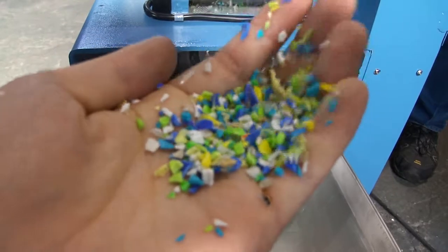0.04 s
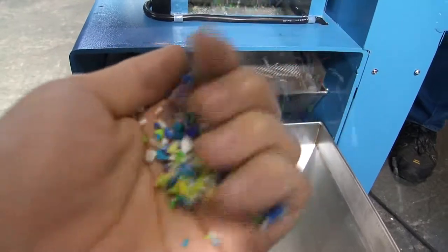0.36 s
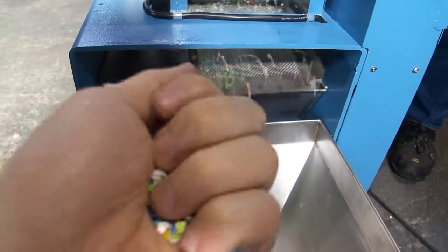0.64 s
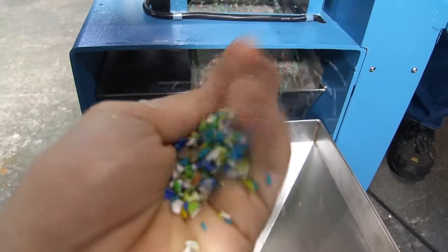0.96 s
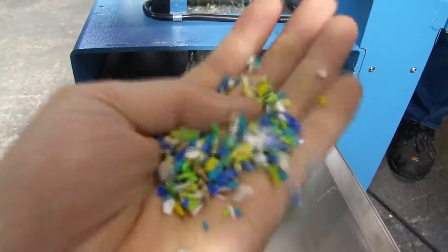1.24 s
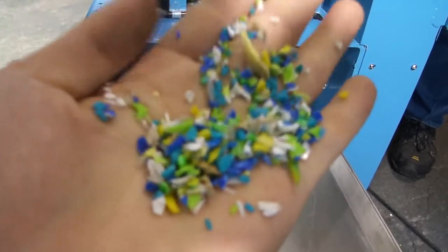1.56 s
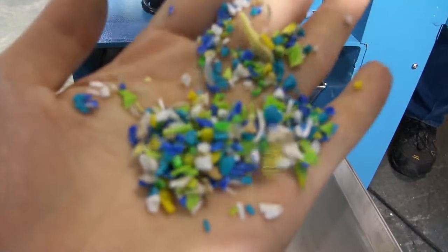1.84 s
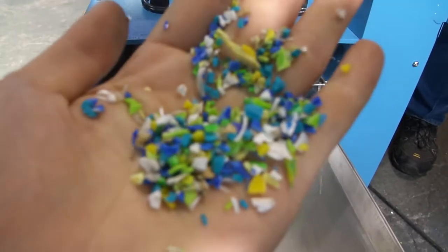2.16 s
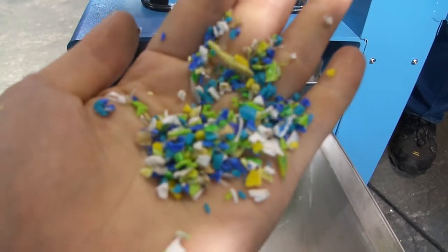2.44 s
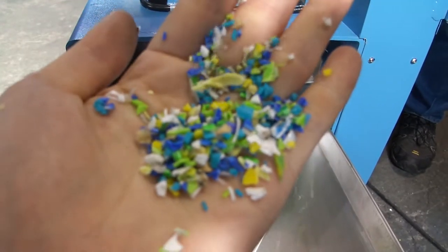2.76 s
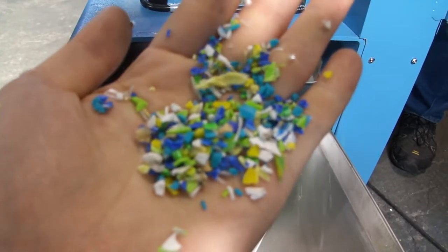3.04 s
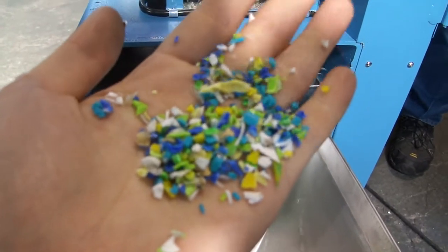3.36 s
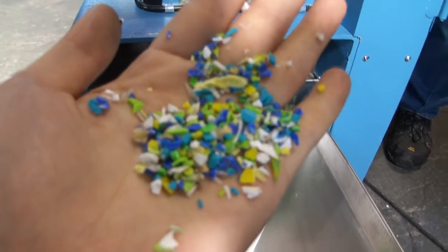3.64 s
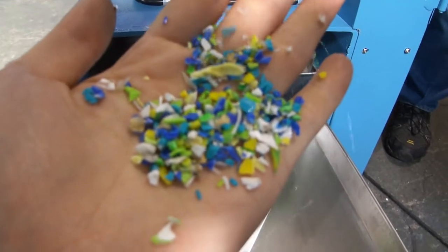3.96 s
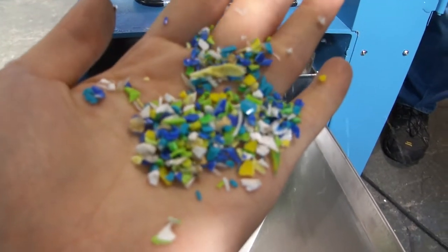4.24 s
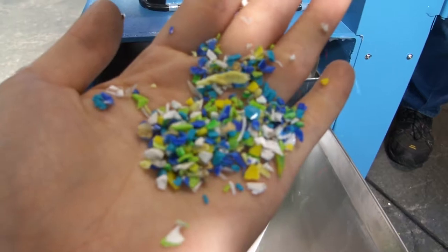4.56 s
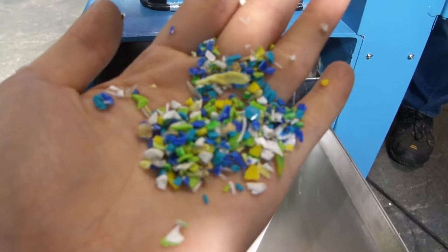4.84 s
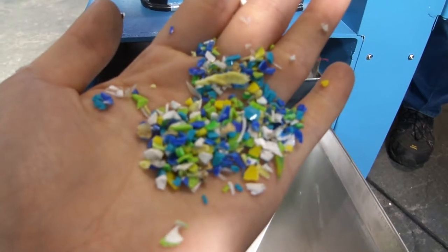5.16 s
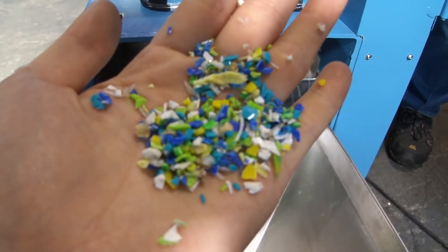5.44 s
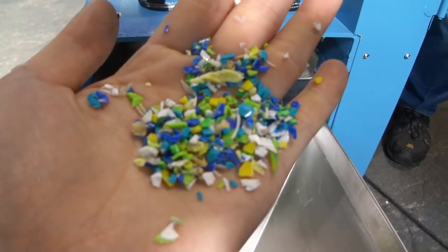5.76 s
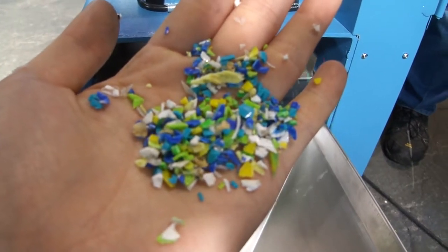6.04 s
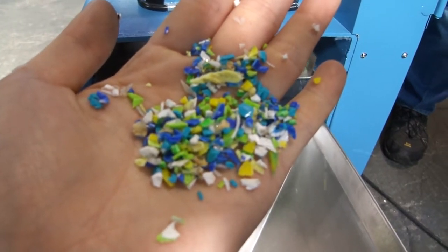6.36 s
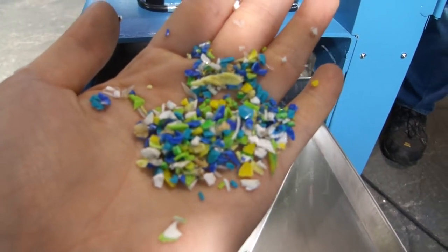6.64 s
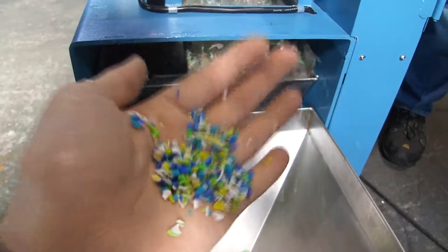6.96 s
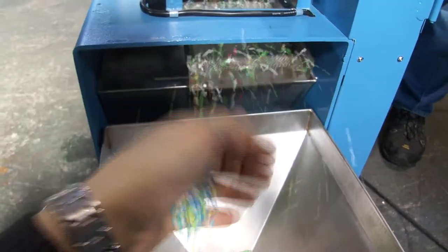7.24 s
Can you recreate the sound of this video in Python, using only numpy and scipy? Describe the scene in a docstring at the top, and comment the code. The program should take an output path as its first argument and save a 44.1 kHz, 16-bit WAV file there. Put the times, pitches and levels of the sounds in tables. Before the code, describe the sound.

A plastic granulator roars and hums as it crunches bottle caps, with flakes clattering steadily onto a sieve and metal tray.

```python
"""A plastic granulator chews bottle caps, heard from just in front of its outlet.
Flakes clatter on the sieve and tray; caps crunch in the knives and clang on the steel chamber.
The rotor's knife snips once a turn, squeaking in spells and throwing chips.
The housing roars and hums with the rotor; a slower shaft drones as it stirs the load.
Underneath lies a faint low rumble with a few swells."""
import sys
import numpy as np
from scipy import signal
from scipy.fft import rfft, irfft, next_fast_len
from scipy.io import wavfile
from scipy.ndimage import uniform_filter1d, minimum_filter1d, map_coordinates

SR = 44100
rng = np.random.default_rng(int(sys.argv[2]) if len(sys.argv) > 2 else 0)


def master(y):
    """Save y as 16-bit WAV."""
    cut = np.clip(np.atleast_2d(y).T, -1, 1)
    pcm = np.round(cut * 32767)  # scale
    wavfile.write(sys.argv[1], SR, pcm.astype(np.int16))


N = 325899
TIME = np.arange(N) / SR
STIR_HZ = 19.1  # speed of the slower shaft

# slow rise and fall of the hum and roar: t/s, level/dB
HUM_LEVEL = [(0.0, -29), (0.33, -25), (0.55, -28), (0.78, -25.5), (1.0, -28), (1.65, -25.5), (2.75, -24.5),
             (3.35, -27), (4.2, -23), (5.3, -25.5), (6.15, -25), (7.39, -28)]
# drumming of the load on the housing: t/s, level/dB
DRUMMING = [(0.0, -31), (0.25, -23.5), (0.54, -39), (0.86, -29), (1.45, -28), (1.75, -25), (2.02, -22.5),
            (2.16, -37), (2.32, -28), (2.47, -21), (2.8, -23), (3.0, -25.5), (3.08, -34), (3.8, -27.5),
            (4.95, -28.5), (5.22, -24), (5.75, -29), (7.05, -26.5), (7.39, -30)]
# spectrum of cracking plastic: f/Hz, level/dB
CRACK_SPECTRUM = [(200, -49), (1100, 10), (1800, 5.5), (2600, 6.5), (5500, 5.5), (8000, 4.5), (10500, 4),
                  (12000, 1.5), (13200, -13)]


def flakes(level_db=-1.5, clump_db=2.0, snap_db=-13):
    """Flakes flung by the slower shaft pelt sieve and tray in clumps; a few near ones snap dryly."""
    # flow of flakes: t/s, level/dB
    flow = [(0.0, -28.5), (0.14, -20.5), (0.27, -23.5), (0.68, -22), (1.67, -25), (2.39, -22),
            (3.33, -25.5), (3.68, -21.5), (4.25, -24), (4.77, -24), (6.34, -24.5), (6.96, -23), (7.39, -23)]
    # flake impact spectrum: f/Hz, level/dB
    spectrum = [(80, -42), (300, -25), (900, -12.5), (1900, -0.5), (2500, 4), (3400, 3), (4300, 1.5),
                (5500, 1), (7000, -0.5), (9000, -3.5), (10300, -1.5), (11800, -5.5), (13000, -28)]
    # blades flinging flakes: phase/turns, half width/turns, lift/dB
    flings = [(0.73, 0.17, 6), (0.14, 0.12, 6.5)]
    flung = stirring(flings)
    hits = clicks(per_s=4500, spread_db=3.0) * amp(clump_db * wander(35)) * flung
    patter = unit_rms(colour(echoes(hits, t60_s=0.04, wet_db=8.5), spectrum))
    near_hits = clicks(per_s=54, spread_db=0.5) * flung
    snaps = unit_rms(colour(echoes(near_hits, t60_s=0.024, wet_db=1), CRACK_SPECTRUM))
    return (patter + amp(snap_db) * snaps) * amp(curve(flow) - dip_db() + level_db)


def crunches(level_db=-8.0, focus_db=4, focus_octaves=0.68, front_db=3, front_s=0.0017, size=6000):
    """A cap breaks with a snap and a quick run of cracks, strongest near a pitch set by the piece."""
    # caps crushed by the knives: t/s, level/dB, centre f/Hz, decay/s
    crushed = [(0.074, -11.5, 2410, 0.023), (0.182, -12, 3020, 0.026), (0.242, -8, 3400, 0.015),
               (0.399, -7, 5340, 0.012), (0.503, -10, 2420, 0.018), (0.781, -13, 2370, 0.024),
               (1.13, -6.5, 7600, 0.012), (1.179, -12, 8720, 0.023), (1.762, -9, 2420, 0.01),
               (1.815, -10, 7720, 0.026), (1.914, -11.5, 3460, 0.025), (2.281, -9, 3500, 0.018),
               (2.468, -11.5, 4080, 0.025), (2.494, -9.5, 7540, 0.017), (2.678, -10, 4540, 0.0074),
               (2.71, -13, 4130, 0.015), (2.78, -14.5, 2260, 0.028), (2.828, -7.5, 2340, 0.019),
               (3.005, -12.5, 2300, 0.058), (3.012, -5, 5300, 0.015), (3.0587, -5.5, 4000, 0.019),
               (3.09, -8.5, 8140, 0.011), (4.015, -14, 2480, 0.026), (4.263, -5.5, 2280, 0.034),
               (4.318, -6.5, 4260, 0.028), (4.641, -6, 6290, 0.022), (4.768, -12, 8440, 0.056),
               (4.903, -9.5, 5450, 0.02), (5.395, -10, 4480, 0.024), (5.443, -8.5, 5000, 0.024),
               (5.519, -8, 4600, 0.032), (6.308, -6, 3120, 0.035), (6.39, -11, 3340, 0.031),
               (6.598, -15, 4800, 0.018), (6.723, 1, 8090, 0.015), (6.741, -12.5, 2660, 0.081),
               (6.884, -8.5, 7540, 0.031), (6.933, -4.5, 4570, 0.026), (7.099, -8, 5260, 0.017),
               (7.175, -11, 4140, 0.016), (7.254, -10.5, 5100, 0.027), (7.301, -8, 5800, 0.03)]
    out, t = np.zeros(N), np.arange(size) / SR
    grid_hz = np.geomspace(200, 14000, 40)
    for start_s, db, hz, decay_s in crushed:
        focus = np.exp(-(np.log2(grid_hz / hz) / focus_octaves) ** 2)
        spectrum = np.c_[grid_hz, at_hz(CRACK_SPECTRUM, grid_hz) + focus_db * focus]
        run = unit_rms(colour(clicks(per_s=5000, spread_db=2.0, size=size), spectrum))
        envelope = amp(front_db * np.exp(-t / front_s)) * np.exp(-(t / decay_s) ** 2)
        add(out, start_s, amp(db + level_db) * run * envelope)
    return echoes(out, t60_s=0.07, wet_db=-8.0)


def chamber(level_db=-3, flutter_db=0.9, whine_hz=1570, drift_hz=3, whine_db=-6.0, ring_s=0.012):
    """Each blade throws caps at the steel chamber; one mode sings on between the blows."""
    # broad chamber modes: f/Hz, width/Hz, level/dB
    modes = [(1545, 15, 4.5), (1498, 25, 1), (1469, 58, -6), (1637, 27, -6.5)]
    # caps clanging round the chamber: t/s, length/s, level/dB
    clangs = [(0.247, 0.012, -17), (0.393, 0.026, -21), (0.454, 0.014, -20), (0.509, 0.019, -16.5),
              (0.585, 0.013, -14), (0.742, 0.036, -23), (0.794, 0.014, -16.5), (1.085, 0.014, -19),
              (1.262, 0.075, -22.5), (1.395, 0.017, -18.5), (1.452, 0.012, -17), (1.504, 0.015, -20),
              (1.839, 0.011, -13), (2.049, 0.019, -17), (2.132, 0.029, -19), (2.363, 0.01, -21),
              (2.604, 0.021, -18), (2.836, 0.021, -16), (2.989, 0.015, -15), (3.232, 0.011, -13.5),
              (3.566, 0.013, -17), (3.726, 0.015, -24), (3.772, 0.023, -20), (3.834, 0.013, -17),
              (3.881, 0.017, -16), (3.965, 0.013, -20), (4.438, 0.018, -18), (4.539, 0.043, -22.5),
              (4.59, 0.029, -20), (4.699, 0.015, -15), (4.772, 0.016, -14.5), (4.907, 0.03, -16),
              (5.038, 0.022, -17), (5.245, 0.015, -22), (5.35, 0.0083, -15), (5.454, 0.031, -20),
              (5.818, 0.024, -19.5), (5.926, 0.013, -15), (6.112, 0.015, -20), (6.319, 0.011, -19.5),
              (6.372, 0.033, -19), (6.528, 0.015, -22), (6.607, 0.025, -23), (6.684, 0.019, -24),
              (6.789, 0.029, -20.5), (6.892, 0.016, -17.5), (6.934, 0.011, -17.5), (6.972, 0.012, -20)]
    # spells in which the long-ringing mode sings out: t/s, length/s, level/dB
    sings = [(.38, 0.2, -31), (1.46, 0.097, -26.5), (2.02, 0.046, -31), (3.68, 0.26, -32), (4.43, .1, -36),
             (4.56, 0.067, -24.5), (4.9, 0.055, -24), (4.99, 0.061, -26), (5.22, .06, -31),
             (5.44, 0.077, -30), (5.91, 0.04, -20), (6.36, 0.093, -37), (6.78, .04, -33), (6.87, 0.1, -31)]
    knocks = clicks(per_s=170, spread_db=2) + .02 * rng.standard_normal(N)
    flutter = unit_rms(amp(flutter_db * wander(22)))
    blows = swells(clangs, rest_db=-28, rise_s=0.0025, fall_s=0.0045) * flutter
    walls = flatten(resonate(knocks, modes), size=700) * blows * amp(level_db)
    pole = np.exp(-1 / (ring_s * SR))
    afterring = signal.lfilter([1 - pole], [1, -pole], blows) * amp(whine_db)
    singing = swells(sings, rest_db=-46, rise_s=0.0099, fall_s=0.0099)
    whine = sine(whine_hz + drift_hz * wander(8)) * np.hypot(afterring, singing)
    return (walls + whine) * blade_beat(depth_db=1.0, phase_cycles=0.62) * amp(-0.66 * dip_db())


def snips(turns, since_s, bite_db, edge_hz=9480, spread_hz=130, peak_s=0.0013, half_width_s=0.0008):
    """The knife shears past the bed knife: a dry scrape and a briefly lingering squeak of the edge."""
    # knife modes: f/Hz, width/Hz, level/dB
    modes = [(9200, 510, 0), (8580, 180, 9.5), (7540, 210, 10), (5300, 330, -14), (4540, 240, -19),
             (2530, 430, -2.5)]
    scrape_db, linger_db, ring_s = -4.0, -9, 0.0021
    stroke = np.exp(-((since_s - peak_s) / half_width_s) ** 2)
    linger = (since_s > peak_s) * amp(linger_db) * np.exp((peak_s - since_s) / ring_s)
    pitch_hz = edge_hz + spread_hz * (.5 * per_turn(turns) + wander(600))
    squeak = sine(pitch_hz) * np.maximum(stroke, linger)
    scrape = flatten(resonate(rng.standard_normal(N), modes), size=60) * stroke * amp(scrape_db)
    return echoes((squeak + scrape) * amp(bite_db), t60_s=.04, wet_db=-13)


def bite(turns, since_s, idle_db=-43.0, square_db=-12.5, feed_db=3.0, chance_db=2.2):
    """Level/dB of each knife pass: high in spells, higher when just fed, fixed on a square hit."""
    # spells of hard biting: start/s, end/s, level/dB
    spells = [(0.24, 0.81, -16.5), (0.87, 1.75, -15.5), (1.96, 2.2, -18), (2.87, 2.95, -12.5),
              (3.12, 3.2, -20), (3.23, 3.4, -15), (3.44, 3.58, -14), (3.82, 4.31, -17.5), (4.5, 4.87, -17),
              (4.95, 5.2, -21), (5.65, 7.28, -16.5)]
    pass_s = TIME - since_s
    level_db = np.full(N, idle_db)
    for start_s, end_s, db in spells:
        level_db[(pass_s > start_s) & (pass_s < end_s)] = db
    feed = np.cos(2 * np.pi * (pass_s * STIR_HZ - 0.78))
    return np.where(caught(since_s), square_db, level_db + feed_db * feed + chance_db * per_turn(turns))


def caught(since_s):
    """True throughout each pass in which the knife catches a cap squarely."""
    # square hits: t/s
    square_hits = [.36, .5, .89, .92, 1.03, 1.34, 1.45, 1.63, 1.66, 2.12, 3.28, 3.31, 3.38, 3.49, 3.52,
                   4.75, 4.96, 5.07, 5.18, 5.7, 5.91, 6.05, 6.23, 6.48, 6.58, 6.69, 7.14]
    return sum(abs(TIME - since_s - hit_s) < .017 for hit_s in square_hits) > 0


def cracks(since_s, level_db=-15, decay_s=0.0015):
    """A squarely caught cap splits with one dry tick."""
    crackle = unit_rms(colour(clicks(per_s=7000, spread_db=2.5), CRACK_SPECTRUM))
    ticks = crackle * caught(since_s) * np.exp(-since_s / decay_s)
    return echoes(ticks * amp(level_db), t60_s=0.045, wet_db=-12)


def chips(since_s, bite_db, level_db=-23, decay_s=0.0068, follow=0.028):
    """Each knife pass throws a spray of chips that dies before the next."""
    # chip spray spectrum: f/Hz, level/dB
    spectrum = [(80, -31), (300, -25.5), (800, 2), (1900, -5.5), (2600, 1), (4000, -3.5), (5400, 3),
                (7500, -4), (10200, 1.5), (11800, -11), (13000, -31)]
    burst = np.exp(-since_s / decay_s) * amp(level_db + follow * (bite_db - bite_db.mean()))
    spray = unit_rms(colour(clicks(per_s=9000, spread_db=3.5) * burst, spectrum))
    return echoes(spray * np.sqrt(np.mean(burst ** 2)), t60_s=0.051, wet_db=5.5)


def rotor(first_snip_s=.0085):
    """Turns made so far, and time/s since the knife last passed the bed knife."""
    # rotor speed: t/s, f/Hz
    speed = [(0, 28.44), (.7, 28.465), (1.3, 28.465), (2.2, 28.47), (2.75, 28.4), (3.4, 28.49),
             (4.0, 28.41), (4.7, 28.52), (5.3, 28.38), (5.9, 28.46), (7.39, 28.44)]
    speed_hz = curve(speed)
    turns = np.cumsum(speed_hz) / SR - first_snip_s * speed_hz[0]
    return turns, turns % 1 / speed_hz


def housing(turns, panel_db=-5.0, roar_db=1.05, pump_db=2.17, growl_db=0.1):
    """Tumbling caps drum on the panels over the mill's broad roar, which throbs with both shafts."""
    # panel modes: f/Hz, width/Hz, level/dB
    modes = [(238.2, 7.4, -8.5), (269.3, 20.6, -7.5), (299.4, 23, -3), (375.8, 28.4, -4), (433.2, 21, -0.5),
             (467.3, 18, -8)]
    # roar spectrum: f/Hz, level/dB
    spectrum = [(60, -53), (120, -26.5), (190, -10), (270, 0), (450, 2), (520, -1.5), (800, 3.5),
                (1120, -2), (1400, 5.5), (1900, -1.5), (4000, -11), (10000, -14.5), (13000, -23.5)]
    # blades shoving the load: phase/turns, half width/turns, lift/dB
    shoves = [(0.853, 0.03, 4.4), (0.234, 0.028, 5.1)]
    panels = flatten(resonate(rng.standard_normal(N), modes), size=4000)
    panels *= amp(curve(DRUMMING) + panel_db + growl_db * np.cos(2 * np.pi * (turns - .08)))
    throb = stirring(shoves) * amp(pump_db * np.cos(2 * np.pi * (turns - 0.24)))
    roar = noise(spectrum) * throb * amp(curve(HUM_LEVEL) - dip_db() + roar_db)
    return panels + roar


def hum(turns, whirr_db=28.0, drone_order=11, buzz_order=44, waver=0.3):
    """Multiples of both shaft speeds, shaken by the uneven load; the lowest swell as the panels drum."""
    # housing hum: multiple of rotor speed, level/dB
    rotor_orders = [(12, -41), (13, -48), (14, -41), (15, -47), (16, -46), (18, -49), (20, -46), (21, -42),
                    (22, -44), (24, -46), (25, -48), (26, -39), (27, -44), (28, -40.5), (29, -38),
                    (30, -39), (31, -47), (32, -38.5), (33, -46), (34, -45.5), (36, -51), (38, -50),
                    (39, -48), (40, -50), (41, -45), (42, -48), (43, -48), (55, -41)]
    # slower shaft's hum: multiple of its speed, level/dB
    stir_orders = [(12, -52), (14, -47), (20, -39)]
    # strongest hum line: t/s, level/dB
    drone_levels = [(0, -53), (.25, -36), (.56, -45), (.85, -35.5), (1.05, -40), (1.22, -33.5), (1.45, -39),
                    (1.8, -37), (2.03, -26), (2.3, -44), (2.45, -31), (2.85, -27.5), (3.08, -37.5),
                    (4.3, -38.5), (5.6, -35.5), (6.05, -36), (6.3, -34), (6.58, -32.5), (6.85, -38.5),
                    (7.1, -27), (7.22, -51), (7.39, -30)]
    # high rotor buzz that comes and goes: t/s, level/dB
    buzz_levels = [(0, -45), (.16, -46), (.35, -32), (1.0, -44.5), (1.4, -37.5), (2.1, -38), (2.4, -41),
                   (2.7, -35.5), (3.1, -45), (3.5, -48), (3.75, -34), (4.25, -36), (4.75, -37),
                   (5.1, -33.5), (5.4, -44), (5.75, -34.5), (6.5, -37), (6.85, -45), (7.39, -35.5)]

    def line(cycles, slip_rad=0.2):
        gain = 1 + waver * wander(3)
        return gain * np.cos(2 * np.pi * (cycles + rng.random()) + slip_rad * wander(4))

    whirr = sum(amp(db) * line(order * turns) for order, db in rotor_orders)
    whirr *= amp(curve(HUM_LEVEL) - dip_db() + whirr_db)
    growl = unit_rms(amp(3 * wander(24)))
    drone = line(drone_order * turns) * growl * amp(curve(drone_levels))
    buzz = line(buzz_order * turns) * amp(curve(buzz_levels))
    stir = sum(amp(db) * line(order * STIR_HZ * TIME, slip_rad=0.66) for order, db in stir_orders)
    stir *= unit_rms(amp(curve(DRUMMING)))
    return whirr + np.sqrt(2) * (drone + buzz + stir)


def pings(rattle_db=-6, rise_s=0.00069, size=6000):
    """Hard pieces strike steel and ring briefly, rattling as they do."""
    # strikes: t/s, f/Hz, level/dB, t60/s
    strikes = [(0.402, 5340, -14, .04), (1.918, 3500, -18, 0.1), (2.28, 1085, -12, .045),
               (2.284, 3520, -14, 0.1), (2.552, 3020, -15, 0.062), (2.92, 3400, -17, .06),
               (3.005, 2190, -12.5, 0.051), (3.015, 2260, -13, .05), (3.026, 3520, -13, 0.096),
               (3.046, 3570, -14, 0.064), (3.629, 3360, -13, 0.06), (3.64, 3070, -10, .04),
               (3.647, 3250, -15, .04), (4.266, 1100, -17, .07), (5.216, 8230, -9, 0.041),
               (5.502, 8870, -10, 0.028), (5.53, 4120, -14, .05), (5.535, 4830, -13, .03),
               (5.95, 4900, -15.5, 0.076), (6.145, 1064, -14, 0.084), (6.538, 5540, -12, 0.063),
               (6.597, 5300, -14, 0.07), (6.727, 2710, -10, 0.1), (6.742, 5800, -13, .06),
               (6.934, 1094, -13, .04), (6.942, 4950, -15, .04), (7.102, 5170, -13, 0.06),
               (7.17, 4090, -10.5, 0.054)]
    out, t = np.zeros(N), np.arange(size) / SR
    for start_s, hz, db, t60_s in strikes:
        rattle = flatten(resonate(rng.standard_normal(size), [(hz, hz / 7, 0)]), size=300)
        tone = np.sin(2 * np.pi * hz * t) + amp(rattle_db) * rattle
        envelope = amp(db - 60 * t / t60_s) * (1 - np.exp(-t / rise_s))
        add(out, start_s, tone * envelope)
    return out


def sieve(level_db=-4.0, size=5000):
    """Caps swept along by the blades tap the sieve in quick runs and ring its modes."""
    # sieve modes: f/Hz, t60/s, level/dB
    modes = [(2361, 0.048, -7), (2382, 0.051, -8)]
    # caps skidding over the sieve: t/s, length/s, level/dB
    skids = [(.08, 0.13, -29), (.34, 0.07, -26), (0.585, 0.016, -16), (0.703, 0.043, -24),
             (0.785, 0.072, -23.5), (0.94, 0.18, -30), (1.25, 0.36, -31), (1.85, 0.2, -27),
             (2.244, 0.062, -21.5), (2.34, 0.26, -29), (2.797, 0.11, -27), (2.987, 0.04, -20),
             (3.74, 0.35, -29), (4.162, 0.035, -23), (4.262, 0.084, -24), (4.58, 0.041, -22),
             (4.894, 0.063, -22), (5.02, 0.042, -28), (6.11, .05, -25)]
    rings, t = np.zeros(N), np.arange(size) / SR
    for hz, t60_s, db in modes:
        tap = amp(db - 60 * t / t60_s) * np.sin(2 * np.pi * hz * t)
        rings += signal.oaconvolve(clicks(per_s=120, spread_db=1.5), tap)[:N]
    runs = swells(skids, rest_db=-34, rise_s=0.0043, fall_s=0.018)
    beat = blade_beat(depth_db=1.5, phase_cycles=0.63)
    return flatten(rings, size=1200) * beat * runs * amp(level_db - dip_db())


def rumble(level_db=-3.0, stereo_width=0.36, lean_db=2.0, draught_db=-68):
    """Faint low rumble with a few swells, stronger on the left, and a draught at each microphone port."""
    # rumble spectrum: f/Hz, level/dB
    low_spectrum = [(25, -20), (60, -15), (95, -13), (120, -2), (160, 4), (220, -3.5), (400, -38)]
    # swells of the rumble: t/s, length/s, level/dB
    low_swells = [(0.24, 0.17, -48), (1.4, 0.25, -47), (3.73, 0.13, -46)]
    # air stirring at a port: f/Hz, level/dB
    air_spectrum = [(15, -13), (50, 3), (100, -12), (250, -42)]
    mid, side = noise(low_spectrum), stereo_width * noise(low_spectrum)
    low = np.array([(mid + side) * amp(lean_db), (mid - side) * amp(-lean_db)])
    low *= swells(low_swells, rest_db=-58, rise_s=0.036, fall_s=0.036)
    draught = np.array([noise(air_spectrum), noise(air_spectrum)])
    return low * amp(level_db) + draught * amp(draught_db)


def dip_db():
    """Brief dips in the level of the machine's roar and clatter."""
    # dips: middle t/s, half length/s, depth/dB
    dips = [(3.067, 0.061, 3.5), (4.4, 0.11, 5), (4.922, 0.017, 5), (5.574, 0.03, 4.5), (6.033, 0.044, 5),
            (6.22, .03, 2.5), (6.844, 0.023, 1.5)]
    return sum(db * np.exp(-((TIME - mid_s) / half_s) ** 2) for mid_s, half_s, db in dips)


def stirring(blades):
    """Gain of rms 1 that lifts as each blade of the slower shaft comes round."""
    lift_db = 0
    for phase, half_width, db in blades:
        offset_turns = (TIME * STIR_HZ - phase + .5) % 1 - .5
        lift_db += db * np.exp(-(offset_turns / half_width) ** 2)
    return unit_rms(amp(lift_db))


def blade_beat(depth_db, phase_cycles):
    """Gain of rms 1 that peaks twice per turn of the slower shaft."""
    return unit_rms(amp(depth_db * np.cos(2 * np.pi * (2 * STIR_HZ * TIME - phase_cycles))))


def echoes(x, t60_s, wet_db, size=4096, paths=12):
    """Dense short echoes between steel walls; pieces land all over, so the path keeps changing."""
    t = np.arange(size) / SR
    path = np.repeat(rng.integers(0, paths, N // 128 + 1), 128)[:N]
    out = x.copy()
    for k in range(paths):
        tail = rng.standard_normal(size) * amp(-60 * t / t60_s)
        share = uniform_filter1d((path == k) * 1., size=24)
        out += amp(wet_db) * signal.oaconvolve(x * share, tail / np.linalg.norm(tail))[:N]
    return out


def outlet(x):
    """The steel outlet favours some pitches and swallows others."""
    # resonances and hollows: f/Hz, half width/Hz, gain/dB
    bands = [(666, 52, -2), (1394, 60, -12), (1898, 60, -8.5), (2060, 35, 0), (2112, 54, -6),
             (2260, 40, 0.5), (5260, 55, 2), (8000, 130, -0.5)]
    grid_hz = np.geomspace(20, 20000, 1500)
    gain_db = sum(db * np.exp(-((grid_hz - hz) / half_hz) ** 2) for hz, half_hz, db in bands)
    return colour(x, np.c_[grid_hz, gain_db])


def ports(x, scatter=1):
    """Two microphone ports: alike in the bass, less so in the treble, where scattered sound differs."""
    # likeness of the ports: f/Hz, coherence
    coherence = [(60, .8), (150, .96), (400, .99), (600, .96), (1100, .98), (1450, .995), (1680, .985),
                 (1930, .9), (2220, .99), (2550, .87), (2850, .98), (3100, .92), (4500, .945), (5400, .85),
                 (6200, .92), (7500, .88), (9500, .66), (12500, .53)]
    # left over right: f/Hz, level/dB
    balance = [(30, 1), (120, 4.4), (350, 4), (700, 3.4), (1300, .3), (4000, .3), (8000, -1), (12000, -2.3)]
    # left ahead of right: f/Hz, phase/rad
    lead = [(500, 0), (1500, -.12), (5500, -.11), (7800, -.19), (9500, -.45), (10500, -.72), (12500, -.72)]
    framing = dict(nperseg=256, noverlap=192)
    frames = signal.stft(x, **framing)[2]
    scrambled = frames * np.exp(2j * np.pi * rng.random(frames.shape))
    scattered = 2 * signal.istft(scrambled, **framing)[1][:N]
    size = next_fast_len(N + 4096)
    hz, direct = np.fft.rfftfreq(size, 1 / SR), rfft(x, size)
    likeness = at_hz(coherence, hz)
    bass_cut = 1 - np.exp(-(hz / 220) ** 4)
    side = rfft(scattered, size) * scatter * bass_cut * np.sqrt((1 - likeness) / (1 + likeness))
    lean = amp(at_hz(balance, hz) / 2) * np.exp(.5j * at_hz(lead, hz))
    return irfft(np.array([(direct + side) * lean, (direct - side) / lean]), size)[:, :N]


def amp(db):
    """Decibels to gain."""
    return 10 ** (np.asarray(db) / 20)


def unit_rms(x):
    """Scales to rms 1."""
    return x / np.sqrt(np.mean(x ** 2) + 1e-20)


def flatten(x, size, floor=.01):
    """Evens out the level over a window of size samples."""
    x = unit_rms(x)
    return unit_rms(x / np.sqrt(abs(uniform_filter1d(x ** 2, size=size)) + floor))


def curve(rows):
    """Joins (t/s, value) rows by straight lines."""
    return np.interp(TIME, *np.transpose(rows))


def at_hz(rows, hz):
    """Interpolates (f/Hz, value) rows on a log-frequency axis."""
    row_hz, value = np.transpose(rows)
    return np.interp(np.log(hz + 1), np.log(row_hz + 1), value)


def swells(rows, rest_db, rise_s, fall_s):
    """Gain that rises from rest_db for each (t/s, length/s, level/dB) row and falls back."""
    t = TIME[::32]
    power = amp(rest_db) ** 2
    for start_s, length_s, db in rows:
        rise = (1 + np.tanh((t - start_s) / rise_s)) / 2
        fall = (1 - np.tanh((t - start_s - length_s) / fall_s)) / 2
        power += amp(db) ** 2 * rise * fall
    return np.sqrt(np.interp(TIME, t, power))


def add(mix, start_s, sound):
    """Mixes a sound in at start_s."""
    part = mix[max(round(start_s * SR), 0):][:len(sound)]
    part += sound[:len(part)]


def wander(hz):
    """Random drift of rms 1, with motion up to about hz."""
    knots = rng.standard_normal(2048)
    return unit_rms(map_coordinates(knots, [TIME * 2 * hz], order=1, mode="wrap"))


def per_turn(turns):
    """One random value held through each rotor turn."""
    return np.clip(rng.standard_normal(256), -2, 1)[np.floor(turns).astype(int) + 1]


def clicks(per_s, spread_db, size=N):
    """Random impacts of both signs: many small, a few large."""
    height = amp(spread_db * np.minimum(rng.exponential(1, size), 4)) * rng.choice([-1, 1], size)
    return height * (rng.random(size) < per_s / SR)


def sine(hz):
    """Tone of rms 1 following a pitch curve."""
    return np.sqrt(2) * np.sin(2 * np.pi * np.cumsum(hz) / SR)


def noise(spectrum):
    """Coloured noise of rms 1."""
    return unit_rms(colour(rng.standard_normal(N), spectrum))


def colour(x, spectrum, size=2048):
    """Minimum-phase filter from (f/Hz, level/dB) rows; clicks keep their sharp front."""
    log_gain = np.log(amp(at_hz(spectrum, abs(np.fft.fftfreq(size, 1 / SR)))))
    taps = np.fft.ifft(np.exp(np.conj(signal.hilbert(log_gain)))).real
    return signal.oaconvolve(x, taps)[:len(x)]


def resonate(x, modes):
    """Steep parallel resonances from (f/Hz, width/Hz, level/dB) rows."""
    out = 0
    for hz, width_hz, db in modes:
        b, a = signal.iirpeak(hz, hz / (1.55 * width_hz), fs=SR)  # two passes narrow it to width_hz
        out += amp(db) * signal.lfilter(b, a, signal.lfilter(b, a, x))
    return out


def scene():
    """The whole machine in stereo; the snips arrive more directly than the clatter."""
    turns, since_s = rotor()
    bite_db = bite(turns, since_s)
    clatter = outlet(housing(turns) + chips(since_s, bite_db) + cracks(since_s) + flakes() + crunches())
    ringing = hum(turns) + chamber() + sieve() + pings()
    bass_cut = signal.butter(2, 125, "high", fs=SR, output="sos")  # small parts radiate no deep bass
    radiated = signal.sosfilt(bass_cut, clatter + ringing)
    return ports(radiated) + ports(snips(turns, since_s, bite_db), scatter=0.24) + rumble()


def record(dry):
    """The microphone sheds deep bass, a fast limiter holds the peaks, a low-pass ends the band."""
    low_hz, high_hz, ceiling = 60, 13200, .88
    dry = signal.sosfilt(signal.butter(1, low_hz, "high", fs=SR, output="sos"), dry)
    gain = np.minimum(1, ceiling / (abs(dry).max(0) + 1e-9))
    limited = dry * uniform_filter1d(minimum_filter1d(gain, size=90), size=90)
    low_pass = signal.firwin(255, high_hz, window=("kaiser", 8), fs=SR)
    return signal.oaconvolve(limited, low_pass[None], "same")


dry = scene()
out = record(dry)
master(out)
```